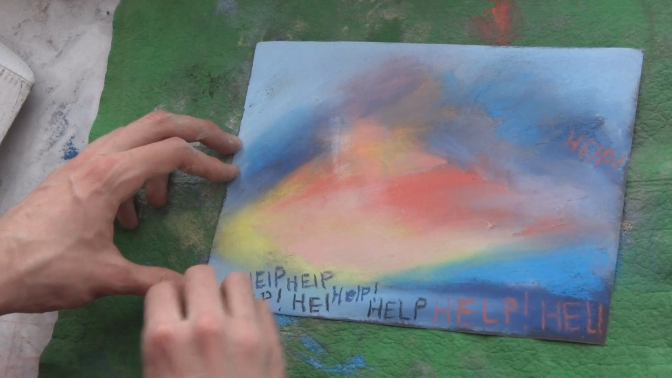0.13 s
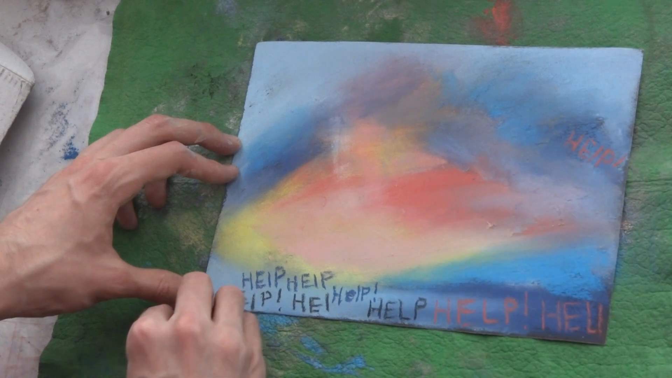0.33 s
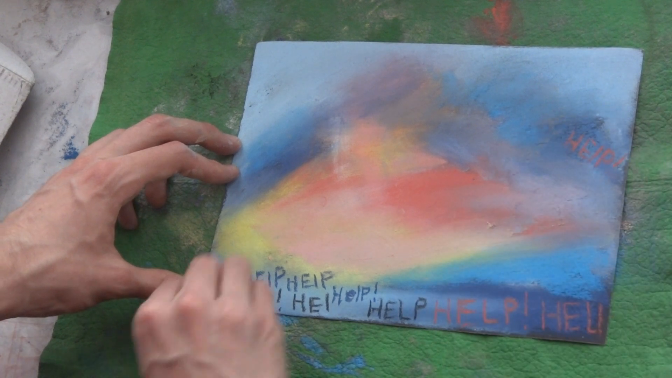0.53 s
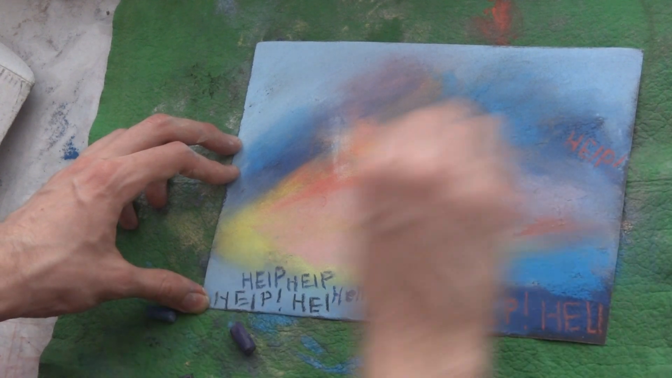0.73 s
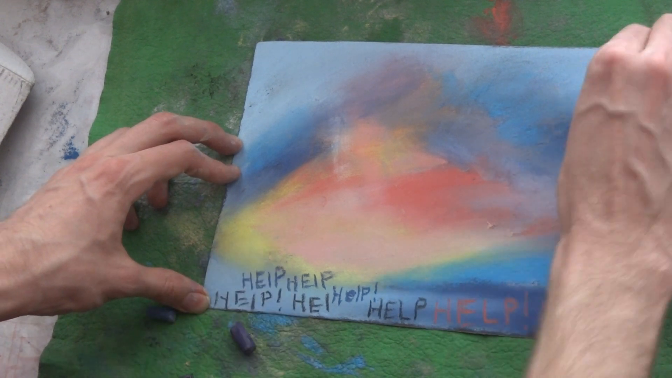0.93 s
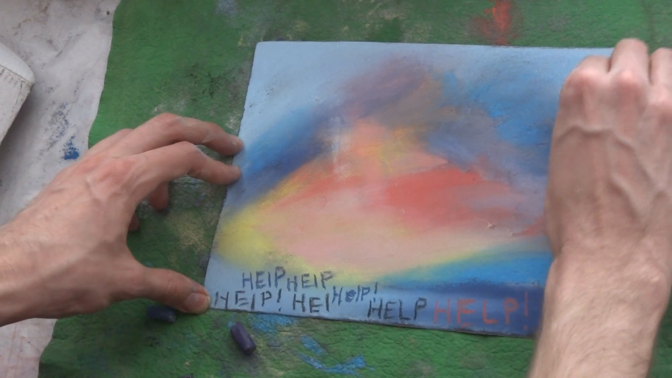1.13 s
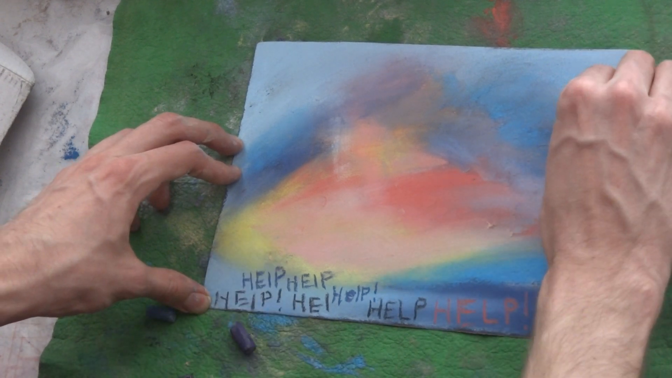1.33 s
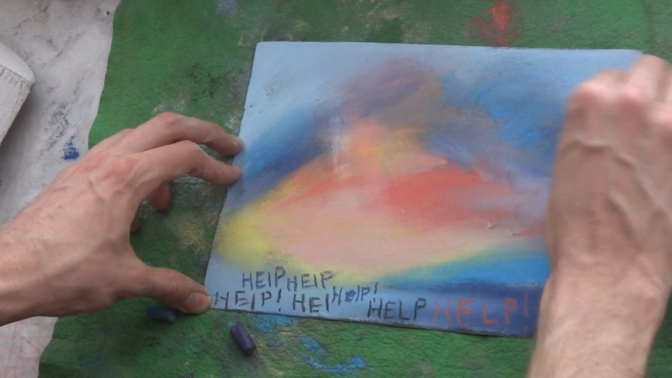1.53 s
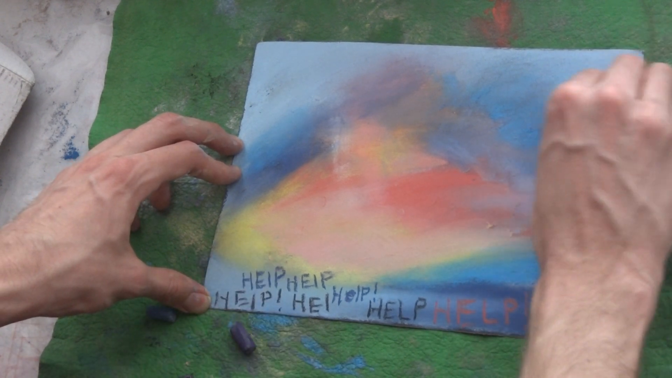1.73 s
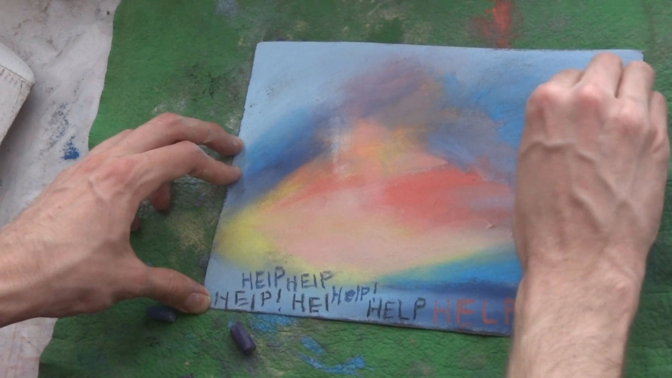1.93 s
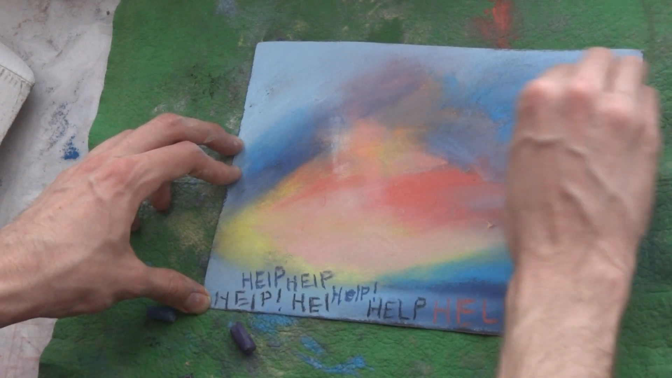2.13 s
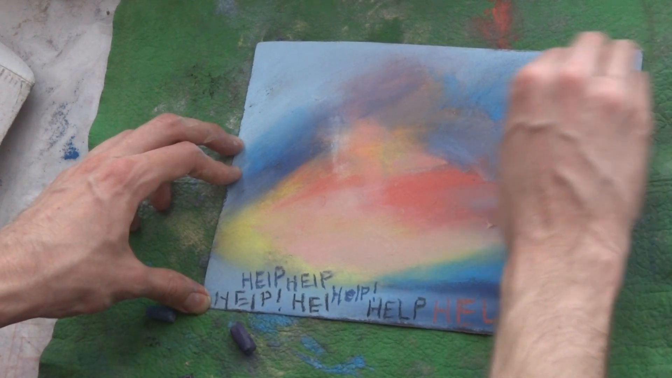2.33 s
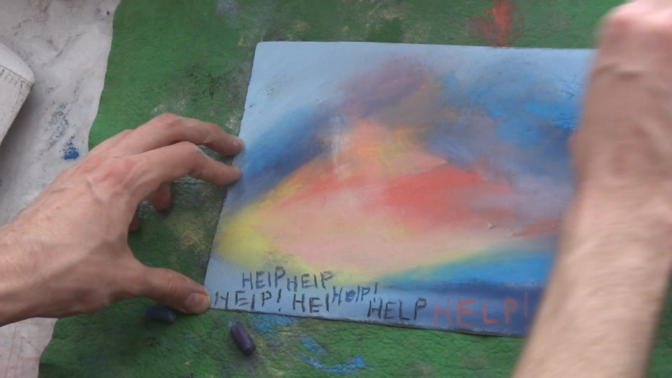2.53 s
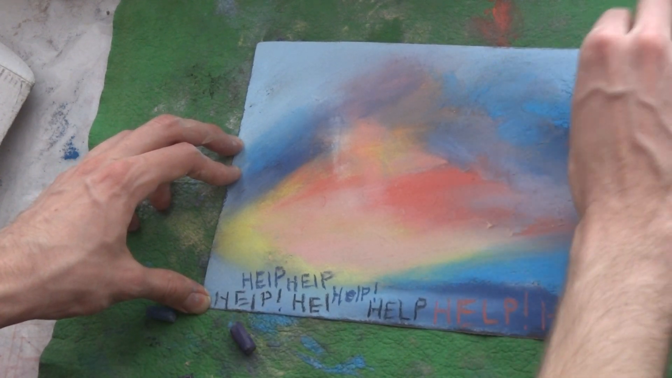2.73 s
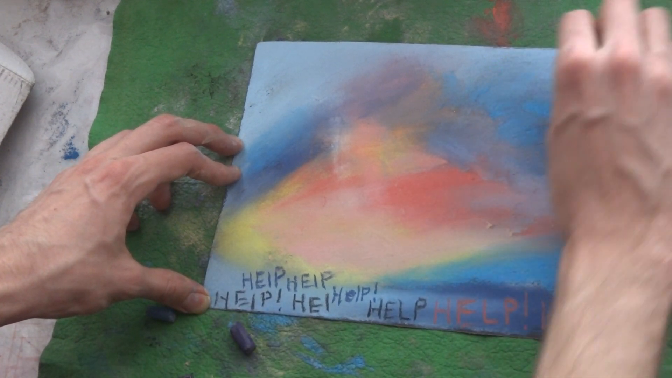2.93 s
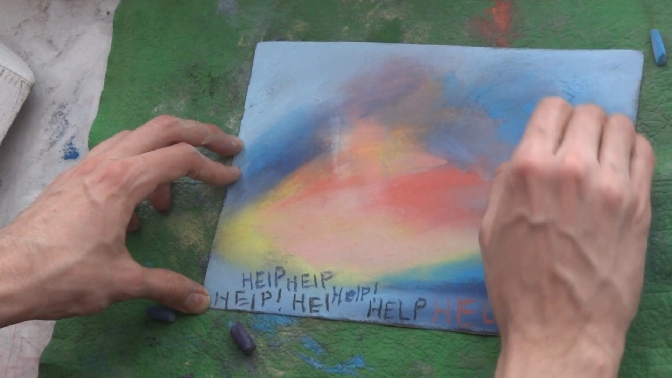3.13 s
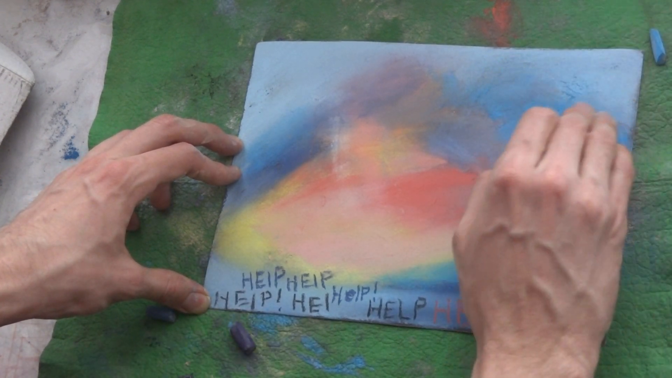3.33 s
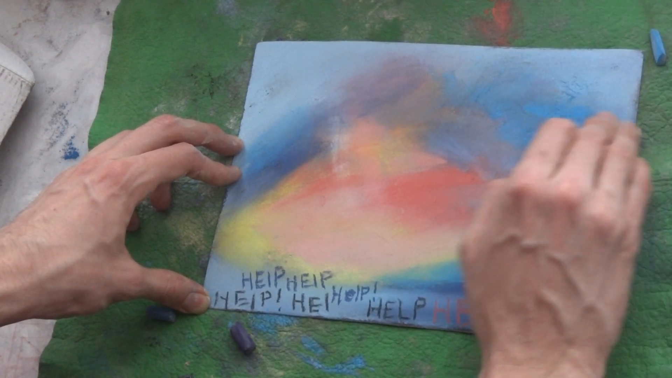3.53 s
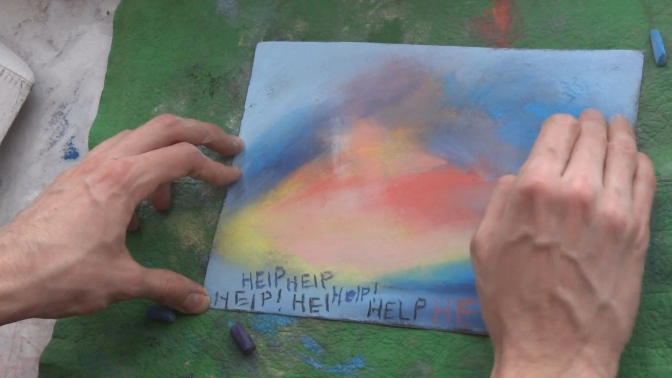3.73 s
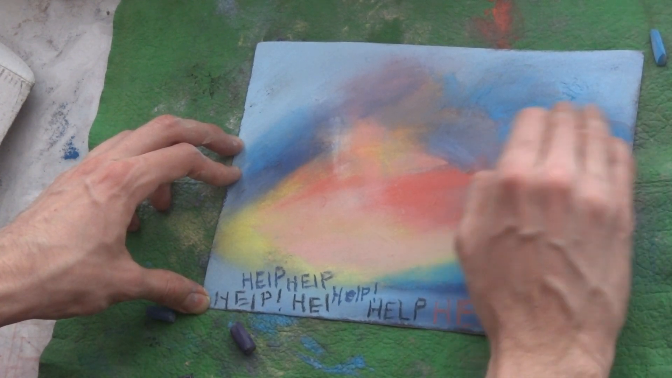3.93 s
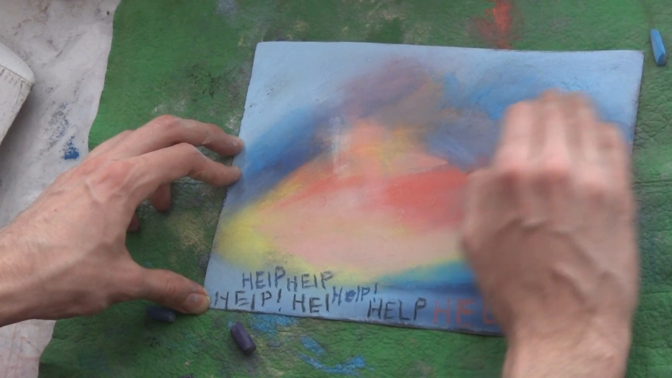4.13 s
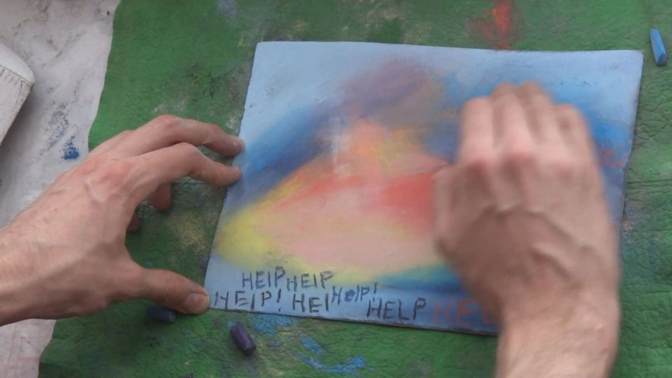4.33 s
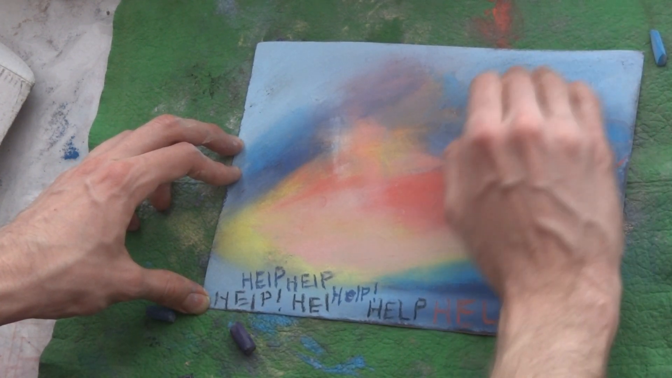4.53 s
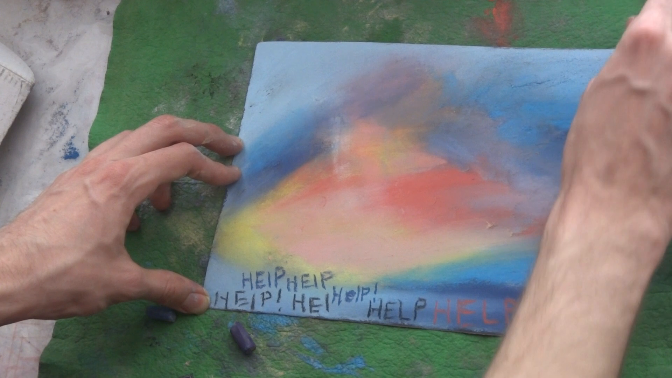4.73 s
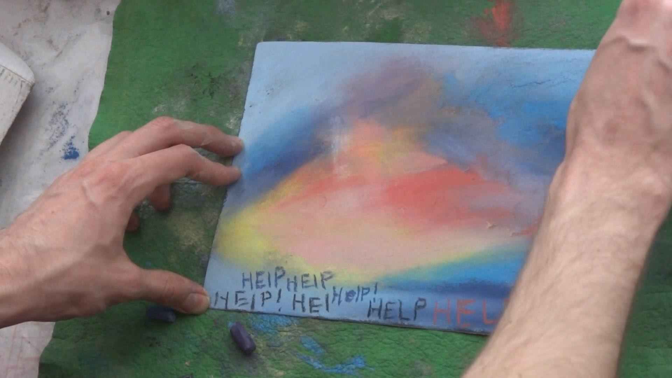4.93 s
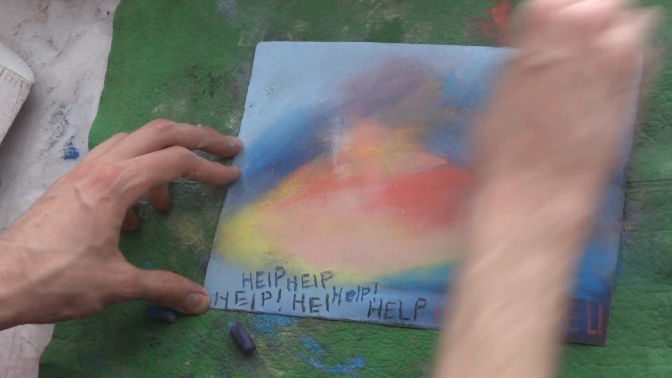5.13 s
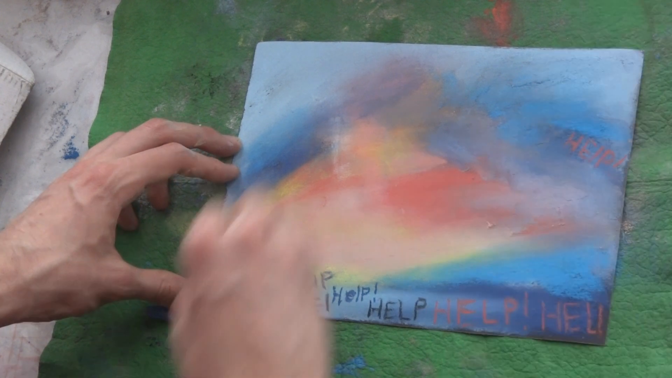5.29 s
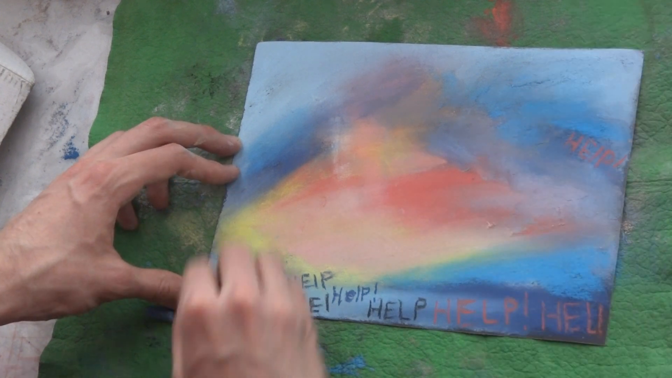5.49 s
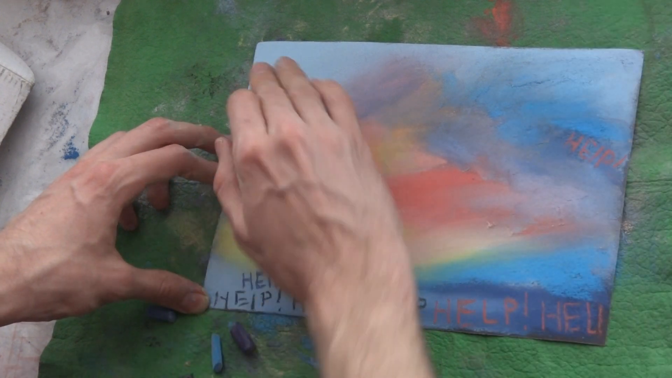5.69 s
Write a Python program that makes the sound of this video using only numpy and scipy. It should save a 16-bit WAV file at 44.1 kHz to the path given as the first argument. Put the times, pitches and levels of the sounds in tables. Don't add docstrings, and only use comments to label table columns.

```python
import sys
import numpy as np
from scipy import signal
from scipy.io import wavfile

SR = 44100
rng = np.random.default_rng(int(sys.argv[2]) if len(sys.argv) > 2 else 0)


def how_loud(loudness_db):
    steps = np.asarray(loudness_db, float) / 20
    return 10 ** steps


def to_wav(s):
    ch = np.atleast_2d(s).T
    pcm = np.round(np.clip(ch, -1, 1) * 32767)
    wavfile.write(sys.argv[1], SR, pcm.astype(np.int16))


N = 254016

# grip_s, top_level_db, time_at_speed_s, board_weight_db
REACH_STROKES = [
    (0.304, -57, 0.038, -12.5),
    (0.36, -48, 0.044, -23.5),
    (0.469, -61.5, 0.099, -6),
]
HARD_STROKES = [(1.187, -50.5, 0.049, 6.5), (1.293, -33, 0.066, -8.5), (1.42, -33, 0.06, -6.5),
                (1.528, -27, 0.059, -7), (1.643, -25.5, 0.057, -9.5), (1.755, -27, 0.063, -5.5),
                (1.874, -31.5, 0.1, -2.5), (2.036, -30, 0.055, -3), (2.131, -25, 0.077, -9.5),
                (2.251, -27.5, 0.064, -3.5), (2.356, -22.5, 0.072, -11), (2.46, -18.5, 0.065, -14),
                (2.558, -41, 0.0093, -7)]
SOFT_STROKES = [(3.157, -60.0, 0.049, -2), (3.23, -56, 0.049, -6), (3.357, -41, 0.033, -0.5),
                (3.444, -41.5, 0.076, -11.5), (3.589, -36.5, 0.075, -2.5), (3.726, -36.5, 0.043, -5.5),
                (3.827, -35.5, 0.065, -4), (3.96, -37, 0.039, 3.5), (4.053, -33.5, 0.059, -8),
                (4.164, -33.5, 0.063, -7), (4.276, -31, 0.074, -11), (4.394, -32, 0.063, -16),
                (4.503, -32, 0.051, -21), (4.581, -46.5, 0.015, -6.5)]
DUSTING_STROKES = [(4.811, -44.5, 0.027, -15), (4.862, -55, 0.034, -8), (4.921, -48.5, 0.042, -19),
                   (4.986, -58, 0.097, -13), (5.064, -50.5, 0.051, -19), (5.138, -63.5, 0.026, -12)]
BOUT_SPARKLE = [1.7, 0.13, 1.2, 3.5]
# pitch_hz, density_db_per_hz
GRIT_COLOUR = [(350, -37), (600, -23.5), (1030, -13.5), (1450, -7), (1610, 12), (1780, -2.5), (1980, -5),
               (2500, -1), (3160, -4.5), (4650, 0), (7830, -4.5), (12000, 1), (14700, -4), (16000, 2)]
# pitch_hz, width_hz, level_db
BOARD_MODES = [(784, 23, -26.5), (1481, 13, 8), (1824, 43, 6.5), (2183, 59, -5), (2472, 40.5, 2.5),
               (2916, 69, 6.5), (3550, 13, -21.5), (3740, 90, 1), (4634, 61, -10), (4870, 37, -40),
               (5680, 74.6, -3), (5920, 150, 2.5), (6300, 165, -22.5), (7200, 210, -27)]
# start_s, peak_db, dullness_db
CRUMBS = [(0.0538, -47.5, -21), (0.3657, -36.5, -18), (0.474, -41, -8), (1.215, -38.5, 0),
          (1.261, -28, -17), (2.065, -23, -16), (3.199, -45, -16), (4.659, -39, -21), (4.815, -35, -22),
          (4.824, -26.5, -31), (4.88, -30.5, -16), (4.923, -39, -24), (5.013, -40, -5), (5.086, -25, -28.5),
          (5.0944, -24.5, -26.5), (5.141, -35.5, -18), (5.145, -34.5, -27), (5.1779, -38, -19.5),
          (5.223, -40, -18), (5.2548, -32.5, -25)]
# start_s, peak_db
STICK_TAP = [
    (5.3464, -18.5),
]
# pitch_hz, level_db, t60_s
STICK_MODES = [(477, -35, 0.022), (876, -30, 0.018), (1920, -39, 0.011), (2210, -12, 0.024),
               (2860, 6.5, 0.0064), (4400, -25, 0.016), (8770, 2, 0.0037), (10800, 3.5, 0.0047),
               (12800, -4, 0.0043)]
# pitch_hz, t60_s
ROOM_DECAY = [(500, 0.51), (1500, 0.86), (4000, 0.43), (9000, 0.11), (15000, 0.16)]
# pitch_hz, density_db_per_hz
AIR_COLOUR = [(15, -60), (25, -25.5), (82, -33), (108, -21), (212, -11.5), (363, -5), (394, -3),
              (516, -0.5), (887, -4.5), (1020, -5.5), (1520, -9.5), (2760, -16.5), (4030, -23),
              (9570, -26.5), (16000, -23)]
# time_s, level_db
AIR_LOUDNESS = [(0.0, -58), (0.85, -60.5), (2.12, -55.5), (3.79, -62), (4.27, -57), (4.7, -61), (5.76, -60)]
# pitch_hz, likeness
AIR_LIKENESS = [(60, 0.83), (180, 0.72), (550, 0.66), (1650, 0.42), (4970, 0.35), (15000, 1)]
# pitch_hz, width_hz, level_db
ROOM_HUM = [(222.6, 13.4, -4.5), (255, 20.6, -6.5), (417.7, 2.8, 5), (469, 7.77, -12), (517.3, 16, 5.5),
            (566, 7.2, -5), (636, 9.56, -17), (654.4, 6.5, -3), (699, 3.3, 2), (754, 2.9, -15),
            (821, 11, -9), (1045, 5.9, -2.5), (1190, 4.1, -10.5)]
# pitch_hz, width_hz, level_db
ROOM_WHINE = [(2680, 200, -19), (3470, 110, -16.5), (5120, 130, -25), (6460, 57, -24), (9750, 90, -16)]

CREEP_S, GRIP_S, GATHER_S, EASE_S, SLOW_S, REST_S = 0.026, 0.011, 0.015, 0.013, 0.023, 0.049
CREEP_DB, SLIP_DB, GRIP_DB, SAG_DB = -29, -18, -3.5, -1.5
EASE_DB, SLOW_DB, REST_DB = -5.5, -21, -33.5
SLOWING_DULLS = 0.16
CRACKLE_DB, CRACKLE_PER_SPARKLE = -13.5, 1.9
RING_DB, SPOT_SPREAD_DB = -4, 2.5


def scrub():
    loud, which = hand()
    rows = strokes()
    top_db, _, board_db, sparkle_db = rows[which, 1:].T
    count = which.max() + 1
    loose_gain = how_loud(CRACKLE_DB + CRACKLE_PER_SPARKLE * sparkle_db)
    loose = loose_gain * contacts(per_s=550, spread_db=4.5, clump_db=4.5)
    grit = [loud * (contacts(per_s=15000, spread_db=2.0, clump_db=1.43) + loose) for _ in range(2)]

    sparkle_db = sparkle_db + SLOWING_DULLS * (20 * np.log10(loud + 1e-6) - top_db)
    shade_db = 1.5 * rng.standard_normal((count, 15))
    hiss = 0
    for k, (hz, sos) in enumerate(bands(516.0, count=15)):
        low = at_hz([(2000, 0.59), (3500, 0.16)], hz)
        high = at_hz([(5000, 0), (9000, 1.0)], hz)
        colour_db = at_hz(GRIT_COLOUR, hz) + low * (board_db + 9.5) + high * (sparkle_db + 0.5)
        colour_db = colour_db + shade_db[which, k] + 2.23 * drift(19)
        hiss = hiss + signal.sosfilt(sos, grit[k % 2] * how_loud(colour_db))

    spot_db = SPOT_SPREAD_DB * rng.standard_normal((count, len(BOARD_MODES)))
    ring = 0
    for k, (hz, width, level_db) in enumerate(BOARD_MODES):
        drive_db = level_db + spot_db[which, k] + 0.6 * (board_db + 14)
        ring = ring + resonance(grit[k % 2] * how_loud(drive_db), hz, width) * (-1) ** k
    return how_loud(1.5) * hiss + how_loud(RING_DB) * ring


def hand():
    loud, which, t = np.zeros(N), np.zeros(N, int), np.arange(N) / SR
    shape_db = [CREEP_DB, SLIP_DB, GRIP_DB, 0, SAG_DB, EASE_DB, SLOW_DB, REST_DB]
    for k, (grip_s, top_db, length, _, _) in enumerate(strokes()):
        gather, ease = min(GATHER_S, length / 3), min(EASE_S, length / 3)
        steady = length - gather - ease
        steps = [-CREEP_S - GRIP_S, CREEP_S, GRIP_S, gather, steady, ease, SLOW_S, REST_S]
        times = grip_s + np.cumsum(steps)
        i, j = (times[[0, -1]] * SR).astype(int)
        loud[i:j] += how_loud(top_db + np.interp(t[i:j], times, shape_db))
        which[i + (j - i) // 20:] = k
    return loud, which


def strokes():
    bouts = [REACH_STROKES, HARD_STROKES, SOFT_STROKES, DUSTING_STROKES]
    return np.array([(*row, sparkle_db) for bout, sparkle_db in zip(bouts, BOUT_SPARKLE) for row in bout])


def contacts(per_s, spread_db, clump_db):
    hardness = np.minimum(rng.exponential(1, N), 5)
    sizes = how_loud(spread_db * hardness) * rng.choice([-1, 1], N)
    catches = rng.random(N) < per_s / SR
    clumps = how_loud(clump_db * (drift(104) + 0.99 * drift(19.0)))
    return rms_one(sizes * catches * clumps)


def ticks():
    out, t = np.zeros(N), np.arange(600) / SR
    bright = signal.butter(2, [4850, 9400], "band", fs=SR, output="sos")
    dull = signal.butter(2, [1500, 16000], "band", fs=SR, output="sos")
    for start_s, peak_db, dull_db in CRUMBS:
        burst = rng.standard_normal(600) * how_loud(-60 * t / 0.023)
        tick = signal.sosfilt(bright, burst) + how_loud(dull_db + 9.5) * signal.sosfilt(dull, burst)
        i = round(start_s * SR)
        out[i:i + 600] += how_loud(peak_db - 11.5) * tick
    return out


def tap():
    t, out = np.arange(2200) / SR, np.zeros(N)
    knock = 0
    for k, (hz, level_db, t60) in enumerate(STICK_MODES):
        knock = knock + how_loud(level_db - 60 * t / t60) * np.sin(2 * np.pi * hz * t) * (-1) ** k
    crack_band = signal.butter(2, 3500, "high", fs=SR, output="sos")
    crack = signal.sosfilt(crack_band, rng.standard_normal(len(t)))
    knock = knock + crack * (how_loud(1.0 - 60 * t / 0.0029) + how_loud(-15 - 60 * t / 0.031))
    start_s, peak_db = STICK_TAP[0]
    for late_s, rebound_db in [(0.0001, -17), (0.0006, -4), (0.0021, -46)]:
        i = round((start_s + late_s) * SR)
        out[i:i + len(t)] += how_loud(peak_db + rebound_db) * knock
    return signal.sosfilt(signal.butter(2, 420, "high", fs=SR, output="sos"), out)


def nearby(x, echo_db, side_db):
    t = np.arange(1, 500) / SR
    mid, side = rng.standard_normal((2, len(t))) * how_loud(-60 * t / 0.022)
    scatter = how_loud(echo_db) * mid + how_loud(side_db) * side * [[1], [-1]]
    return x + signal.fftconvolve(x[None], scatter, axes=1)[:, :N]


def room(x, side_db):
    t = np.arange(SR // 2) / SR
    noise = rng.standard_normal((2, len(t))) * np.minimum(t / 0.005, 1)
    mid, side = sum(signal.sosfilt(sos, noise) * how_loud(-60 * t / at_hz(ROOM_DECAY, hz))
                    for hz, sos in bands(423, count=16)[::2])
    tail = (mid + how_loud(side_db) * side * [[1], [-1]]) / np.sqrt(np.sum(mid ** 2))
    return signal.fftconvolve(x[None], tail, axes=1)[:, :N]


def air():
    out, together, white = 0, drift(0.7), rng.standard_normal((2, 2, N))
    for k, (hz, sos) in enumerate(bands(24.14, count=29)):
        mid, side = signal.sosfilt(sos, white[k % 2])
        alike = np.clip(at_hz(AIR_LIKENESS, hz), 0, 1)
        gain = how_loud(at_hz(AIR_COLOUR, hz) + 0.5 * together + 0.4 * drift(12))
        out = out + gain * (np.sqrt(1 + alike) * mid + np.sqrt(1 - alike) * side * [[1], [-1]])
    source = white[0, 0] + how_loud(-25) * white[1, 1] * [[1], [-1]]
    for hz, width, level_db in ROOM_HUM + ROOM_WHINE:
        out = out + how_loud(level_db + 3.5 + 2.7 * drift(7.3)) * resonance(source, hz, width)
    time_s, level_db = np.transpose(AIR_LOUDNESS)
    return how_loud(np.interp(np.arange(N) / SR, time_s, level_db) + 3.0) * rms_one(out)


def rms_one(x):
    return x / np.sqrt(np.mean(x ** 2) + 1e-20)


def at_hz(points, hz):
    points_hz, values = np.transpose(points)
    return np.interp(np.log(hz), np.log(points_hz), values)


def drift(rate):
    r = np.exp(-16 * np.pi * rate / SR)
    noise = rng.standard_normal(N // 8 + 8002)
    slow = signal.lfilter([1], [1, -2 * r, r * r], noise)[8000:]
    return np.interp(np.arange(N) / 8, np.arange(len(slow)), rms_one(slow))


def resonance(x, hz, width):
    r = np.exp(-np.pi * width / SR)
    feedback = [1, -2 * r * np.cos(2 * np.pi * hz / SR), r * r]
    return signal.lfilter([(1 - r * r) / 2, 0, (r * r - 1) / 2], feedback, x + 1e-18)


def bands(low_hz, count):
    edges = low_hz * 2 ** (np.arange(count + 1) / 3)
    return [(np.sqrt(a * b), signal.butter(2, [a, b], "band", fs=SR, output="sos"))
            for a, b in zip(edges, edges[1:])]


def scene():
    rubbing, touch = scrub() + ticks(), tap()
    close = nearby(rubbing, echo_db=-27.5, side_db=-39.5)
    close = close + touch * how_loud([[-1.7], [1.7]])
    tail = room(rubbing + how_loud(-17) * touch, side_db=-13.5)
    return close + how_loud(-19.5) * tail + air()


def band_limit(x):
    return signal.sosfilt(signal.butter(12, 16840, fs=SR, output="sos"), x)


def record(dry):
    top_cut = signal.ellip(9, 0.5, 40, 15850, fs=SR, output="sos")
    mix = signal.sosfilt(top_cut, dry)
    return band_limit(mix)


dry = scene()
out = record(dry)
to_wav(out)
```